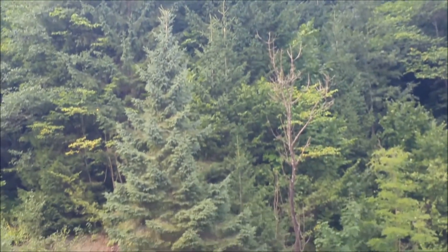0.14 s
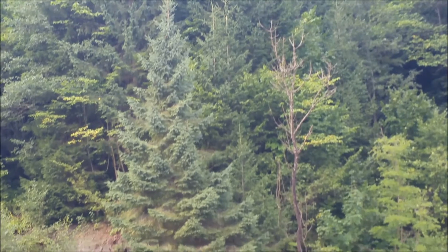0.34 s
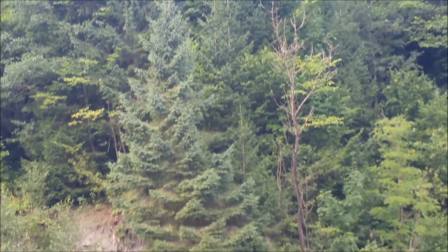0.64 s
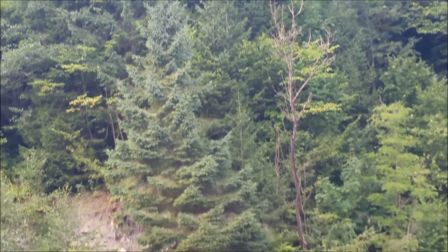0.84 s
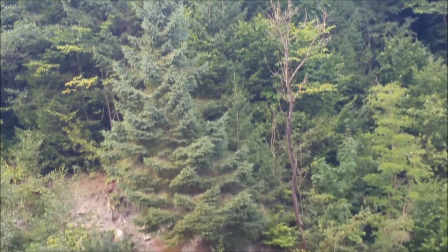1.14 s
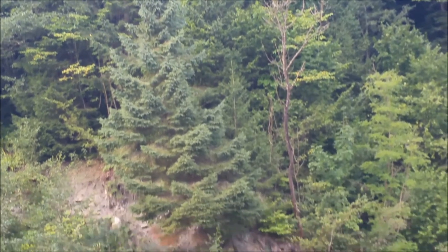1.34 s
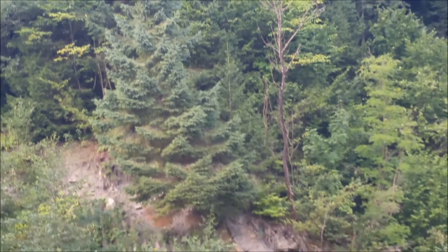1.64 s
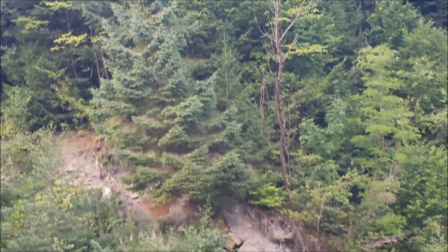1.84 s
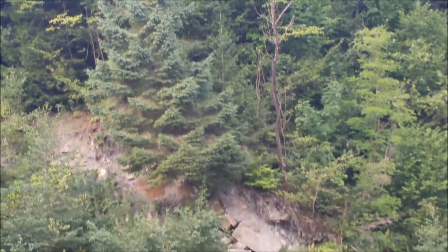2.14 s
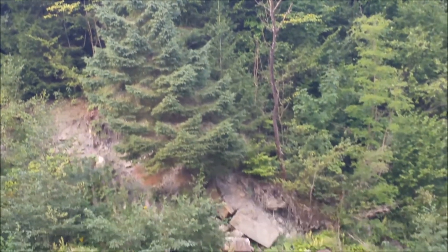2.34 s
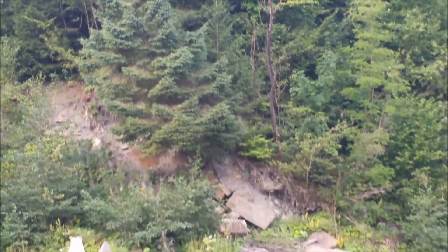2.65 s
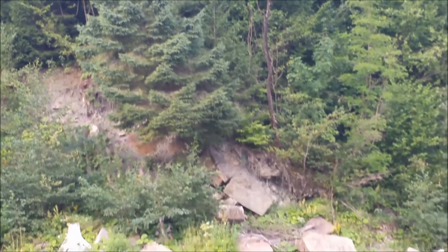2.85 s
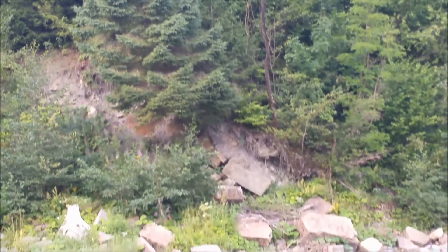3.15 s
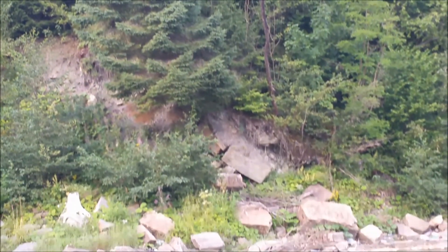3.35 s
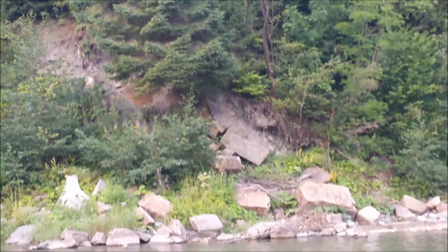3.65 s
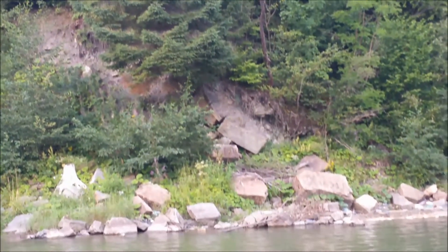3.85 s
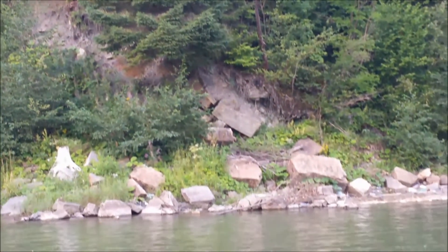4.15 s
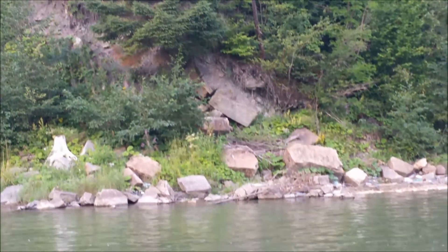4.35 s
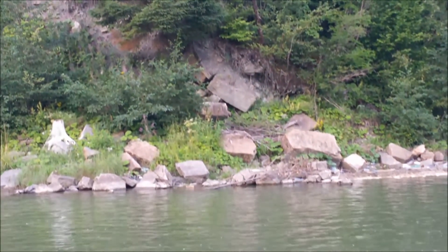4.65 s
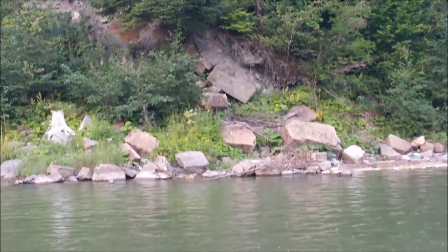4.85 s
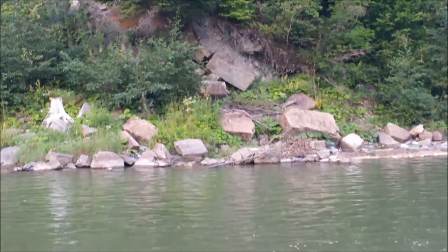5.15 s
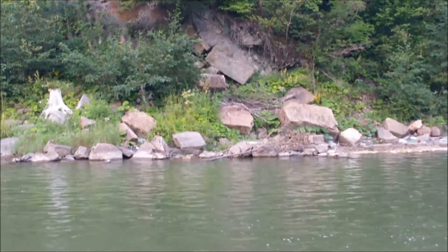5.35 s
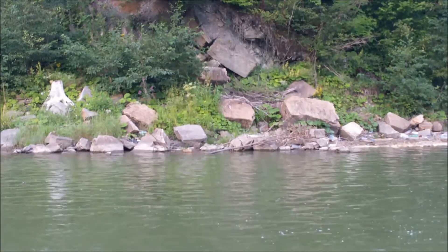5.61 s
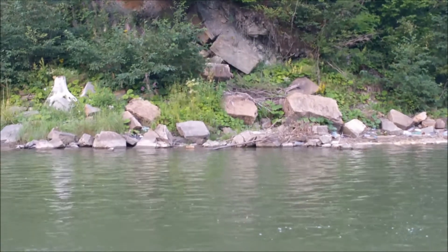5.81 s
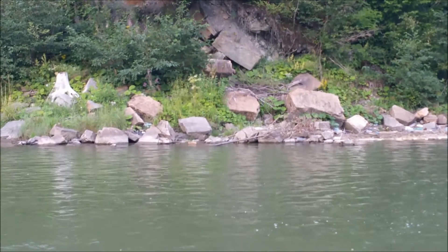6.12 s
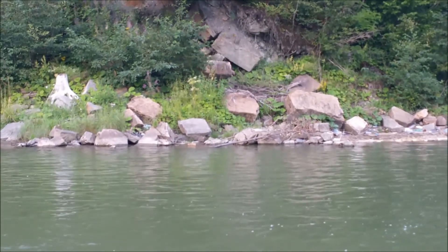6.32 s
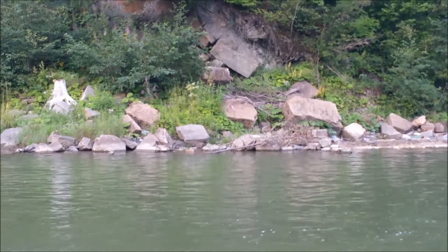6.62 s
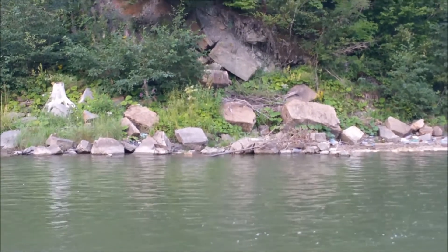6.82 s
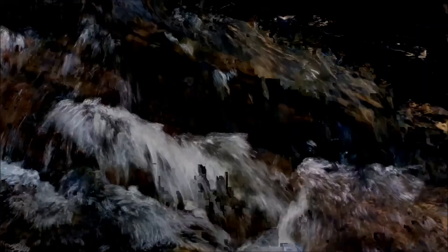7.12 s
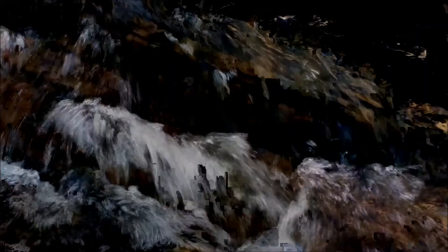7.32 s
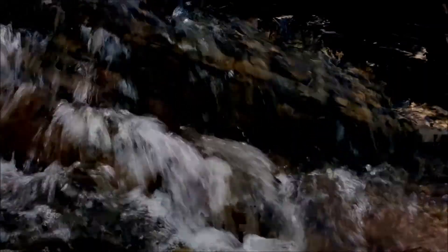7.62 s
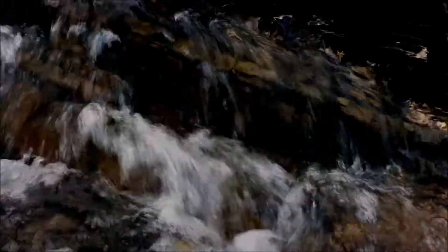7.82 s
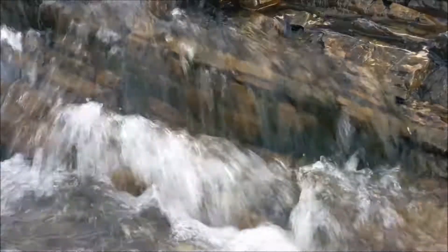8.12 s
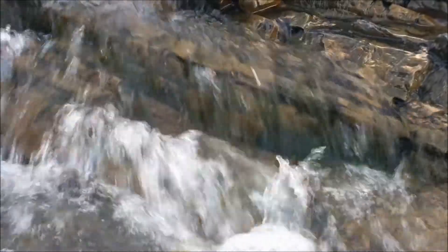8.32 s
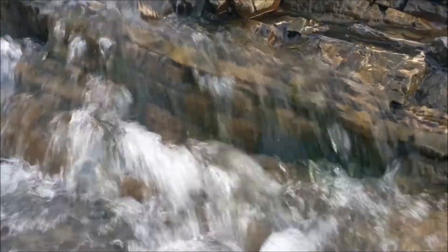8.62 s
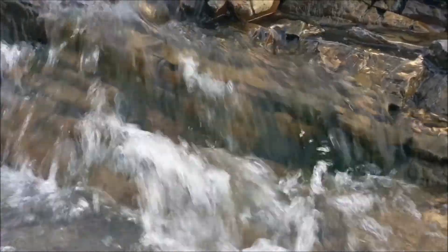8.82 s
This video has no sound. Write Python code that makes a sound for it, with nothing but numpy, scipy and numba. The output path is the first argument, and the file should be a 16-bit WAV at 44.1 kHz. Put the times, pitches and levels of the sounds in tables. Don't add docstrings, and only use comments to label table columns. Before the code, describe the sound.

In an open valley, a wide river is heard from a little way off: a smooth, even, rather dull roar with fine bubbling texture and little hiss, almost constant from 0 to about 4.5 seconds. Under it a faint deep motor hum appears at around 0.5 seconds, throbs slowly a little more than once per second, weakens and is gone shortly after 3.5. From about 4.6 the river fades gradually, reaching silence near 7.1. After a gap of roughly half a second, a close cascade over rocks creeps in very quietly, then jumps up clearly at about 8.2 to 8.3. It is brighter and wetter, with rushing spray, gurgles and crisp plopping splashes, strongest on the right and thickening around 8.6 and 8.9. It keeps growing and stops abruptly at 9 seconds. Stereo camera microphone.

```python
import sys
import numpy as np
from scipy import signal
from scipy.fft import rfft, irfft, next_fast_len
from scipy.io import wavfile
from scipy.ndimage import uniform_filter1d
from numba import njit

SR = 44100
rng = np.random.default_rng(int(sys.argv[2]) if len(sys.argv) > 2 else 0)


def log_audio(samples):
    frames = np.atleast_2d(samples).T
    limited = np.clip(frames, -1, 1)
    pcm = np.round(limited * 32767).astype(np.int16)
    wavfile.write(sys.argv[1], SR, pcm)


def to_linear_factor(level_db):
    exponent = np.asarray(level_db, float) / 20
    return 10 ** exponent


N = 395577

# [f/Hz, density/dB per Hz]
RIVER_LEFT_PORT = [(45, -75), (160, -69.5), (330, -64), (550, -65), (750, -71), (1000, -69), (1500, -72),
                   (1800, -75.5), (2700, -79), (3400, -83.5), (5500, -89), (6100, -95), (11000, -104.2),
                   (15500, -110.4)]
RIVER_RIGHT_PORT = [(45, -81.5), (340, -66), (680, -71), (950, -70), (1250, -74.5), (2500, -70.5),
                    (3300, -79.5), (4700, -83), (6600, -92), (7600, -104), (8800, -106.5), (12000, -104.8),
                    (13300, -111), (15500, -111.3)]
CASCADE_LEFT_PORT = [(85, -86), (200, -76), (500, -66), (750, -67.5), (1100, -64.5), (1300, -70.5),
                     (1600, -63), (2200, -73), (2700, -71), (3400, -76), (5300, -79), (6200, -86),
                     (10000, -87.5), (15500, -92)]
CASCADE_RIGHT_PORT = [(85, -88.5), (500, -70), (1100, -65.5), (1700, -64), (2200, -60.5), (2600, -56.5),
                      (3200, -63), (4200, -65), (5200, -71), (6600, -73.5), (7500, -89.5), (8300, -84.5),
                      (12000, -92.5), (15500, -93.5)]
# [f/Hz, share/0-1]
RIVER_COMMON = [(90, .93), (330, .97), (550, .95), (900, .9), (1400, .8), (1800, .6), (2100, .6),
                (2900, .28), (3300, .45), (4600, .48), (5600, .12), (7500, .05)]
CASCADE_COMMON = [(200, 0.87), (500, 0.98), (750, 0.46), (1100, 0.89), (1500, 1), (2000, 0.13),
                  (2600, 0.19), (3600, 0.17), (5000, 0.08), (6200, 0.14), (7500, 0.06)]
# [f/Hz, phase/rad]
RIVER_PHASE_LEAD = [(0, 0), (690, -1.8), (950, -2.0), (1380, -3.4), (2670, -5.6), (4390, -9.1),
                    (8440, -10.3), (15200, -24.5)]
CASCADE_PHASE_LEAD = [(0, 0), (1030, 1), (1380, 2), (1890, 2), (3530, 7.5), (15200, 36)]
# [t/s, level/dB]
RIVER_STRENGTH = [(0, 0), (.6, -.5), (2.2, -0.5), (3.3, -0.74), (4.1, -0.2), (5.2, -.5), (7, 0.5)]
CASCADE_STRENGTH = [(7.55, -14.5), (7.73, -11.5), (7.95, -13), (8.13, -10.5), (8.3, -2.5), (8.5, 0),
                    (8.912, -0.25), (8.922, -5), (8.97, -1)]
# [f/Hz, share/0-1]
FLOW_SHARE = [
    (130, 0.12),
    (600, 0.85),
    (3000, 0.91),
    (10000, 0.97),
]
# [t/s, peak level/dB, f/Hz]
NEAR_SPLASHES = [(8.2163, -39, 2350), (8.3702, -27.5, 2760), (8.4112, -30, 2560), (8.598, -27, 2530),
                 (8.611, -29, 3070), (8.636, -30, 2520), (8.6525, -28, 2960), (8.657, -33.5, 2810),
                 (8.676, -25, 2950), (8.754, -27, 2570), (8.7693, -30, 2830), (8.8864, -26.5, 3470),
                 (8.8927, -27.5, 3220), (8.909, -27, 2830), (8.914, -24.5, 2460), (8.9358, -22.5, 2830),
                 (8.947, -28.5, 2800), (8.9614, -30, 2100)]

FADE_OUT_END_S, FADE_IN_START_S, FADE_S = 7.07, 7.44, 2.5
HUM_HZ, HUM_WANDER_HZ, HUM_DB = 58.2, 0.7, -56
HUM_ARRIVES_S, HUM_RISE_DB_PER_S, HUM_SAG_DB_PER_S = 0.55, 38, 2.5
HUM_LEAVES_S, HUM_FALL_DB_PER_S = 3.5, 30
HUM_THROB_HZ, HUM_THROB_DB, HUM_THROB_PEAK_S = 1.3, 3.5, 1.5
STFT_SIZE, STFT_HOP = 512, 256


def motor(t):
    throb = np.cos(2 * np.pi * HUM_THROB_HZ * (t - HUM_THROB_PEAK_S))
    db = HUM_DB + HUM_THROB_DB * throb
    db -= HUM_RISE_DB_PER_S * np.maximum(HUM_ARRIVES_S - t, 0)
    db -= HUM_SAG_DB_PER_S * np.maximum(t - HUM_ARRIVES_S, 0)
    db -= HUM_FALL_DB_PER_S * np.maximum(t - HUM_LEAVES_S, 0)
    phase = 2 * np.pi * np.cumsum(HUM_HZ - HUM_WANDER_HZ * throb) / SR
    return np.sin(phase) * to_linear_factor(db) * to_linear_factor([[1.5], [-1.5]])


def flat(x):
    spec = rfft(x)
    power = uniform_filter1d(abs(spec) ** 2, size=len(spec) // 150)
    return irfft(spec / np.sqrt(power * 2 / (SR * len(x))), len(x))


@njit
def ring(size, start, hz, cycles, glide, gain):
    out = np.zeros(size)
    for k in range(len(start)):
        step = 2 * np.pi * hz[k] / SR
        length = int(cycles[k] * SR / hz[k]) + 1
        z = gain[k] + 0j
        decay_turn = np.exp(1j * step - 6.9 / length)
        pitch_rise = np.exp(1j * step * glide / length)
        closed, opening = 1., np.exp(-8 / length)
        for i in range(start[k], min(start[k] + length, size)):
            z *= decay_turn
            decay_turn *= pitch_rise
            closed *= opening
            out[i] += z.imag * (1 - closed)
    return out


def grains(size, share_db, rate, spread_db, low_hz, high_hz, cycles):
    when, pitch, strength, length = rng.random((int(rate * size / SR), 4)).T
    hz = low_hz + (min(high_hz, 0.4 * SR) - low_hz) * pitch ** 2
    gain = hz * to_linear_factor(-spread_db * np.log(1 - 0.995 * strength))
    start = (when * size).astype(np.int64)
    cloud = ring(size, start, hz, cycles * (0.5 + length), 0.43, gain)
    return to_linear_factor(share_db) * cloud / cloud.std()


def walk(shape, rate, spread):
    w = rng.standard_normal(shape)
    for length, axis in ((SR / STFT_HOP / rate, 1), (spread, 0)):
        length = max(int(length), 1)
        w = uniform_filter1d(uniform_filter1d(w, length, axis), length, axis)
    return w / w.std()


def read(table, hz):
    f, value = np.transpose(table)
    return np.interp(np.log(hz + 1), np.log(f), value)


def stream_part(size, bubble, drop, near):
    rush = rng.standard_normal(size)
    bubbles = grains(size, *bubble, 148.2, 11947, 21.2)
    ticks = grains(size, *drop, 5000, 16000, 9)
    return flat(rush + bubbles + near * ticks)


def water(t0, t1, ports, like, lead, flow, bubble, drop, surge_db, gurgle_db, flicker_db):
    size = next_fast_len(int((t1 - t0) * SR))
    parts = np.array([stream_part(size, bubble, drop, near) for near in (0.4, 0.4, 1)])
    hz, s, spec = signal.stft(parts, SR, nperseg=STFT_SIZE, noverlap=STFT_HOP)
    shape = spec.shape[1:]

    db = np.outer(read(FLOW_SHARE, hz), np.interp(s + t0, *np.transpose(flow)))
    db += np.clip(hz / 9000, 0.2, 1.5)[:, None] * surge_db * walk(shape, 4.8, 90)
    db += gurgle_db / (1 + (hz[:, None] / 900) ** 2) * walk(shape, 14, 3)
    flicker = np.array([walk(shape, 25, 6.5) for _ in range(3)])
    spec = spec * to_linear_factor(db + flicker_db * flicker)
    moving = signal.istft(spec, SR, nperseg=STFT_SIZE, noverlap=STFT_HOP)[1][:, :size]
    both, left, right = rfft(moving)

    hz = np.fft.rfftfreq(size, 1 / SR)
    common = np.clip(read(like, hz), 0, 1)
    turn = np.exp(1j * np.interp(hz, *np.transpose(lead)))
    left_port = to_linear_factor(read(ports[0], hz)) * (np.sqrt(common) * both * turn + np.sqrt(1 - common) * left)
    right_port = to_linear_factor(read(ports[1], hz)) * (np.sqrt(common) * both + np.sqrt(1 - common) * right)
    low_cut = hz ** 4 / (hz ** 4 + 47.0 ** 4)
    out, first = np.zeros((2, N)), int(t0 * SR)
    out[:, first:first + size] = irfft(low_cut * np.array([left_port, right_port]), size)[:, :N - first]
    return out


def splashes():
    s, db, hz = np.transpose(NEAR_SPLASHES)
    start, even = (s * SR).astype(np.int64), np.ones(len(s))
    body = ring(N, start, hz, 20 * even, 0.05, to_linear_factor(db))
    tick = ring(N, start, 1.45 * hz, 12 * even, 0.05, to_linear_factor(db - 4.0))
    return (body + tick) * to_linear_factor([[5], [18.5]])


def scene():
    t = np.arange(N) / SR
    river = water(0, 7.2, (RIVER_LEFT_PORT, RIVER_RIGHT_PORT), RIVER_COMMON, RIVER_PHASE_LEAD, RIVER_STRENGTH,
                  bubble=(-3, 6000, 2.8), drop=(-9, 1200, 3.0), surge_db=0.8, gurgle_db=1.08, flicker_db=0.18)
    cascade = water(7.3, 9, (CASCADE_LEFT_PORT, CASCADE_RIGHT_PORT),
                    CASCADE_COMMON, CASCADE_PHASE_LEAD, CASCADE_STRENGTH,
                    bubble=(0, 5000, 2.5), drop=(-6, 1000, 3.0), surge_db=0.5, gurgle_db=1.6, flicker_db=0.8)
    fade_out = np.clip((FADE_OUT_END_S - t) / FADE_S, 0, 1)
    fade_in = np.clip((t - FADE_IN_START_S) / FADE_S, 0, 1)
    far_view = fade_out * (to_linear_factor(0.27) * river + motor(t))
    near_view = fade_in * to_linear_factor(5.0) * cascade
    return far_view + near_view + splashes()


def roll_off(x):
    return signal.sosfilt(signal.butter(12, 15780, fs=SR, output="sos"), x)


def record(dry):
    return roll_off(dry)


dry = scene()
out = record(dry)
log_audio(out)
```